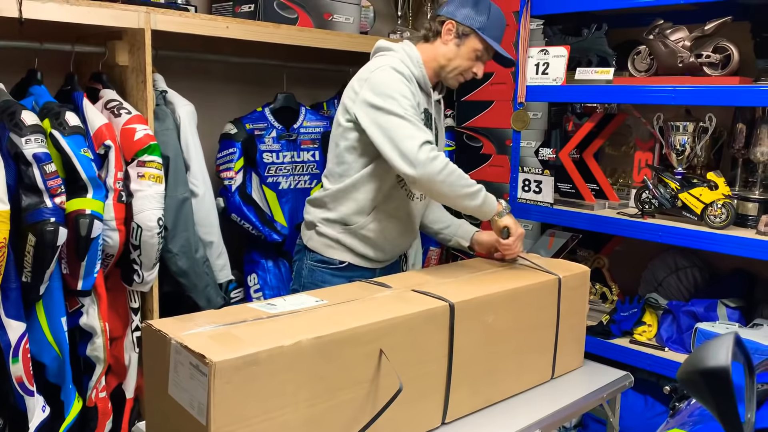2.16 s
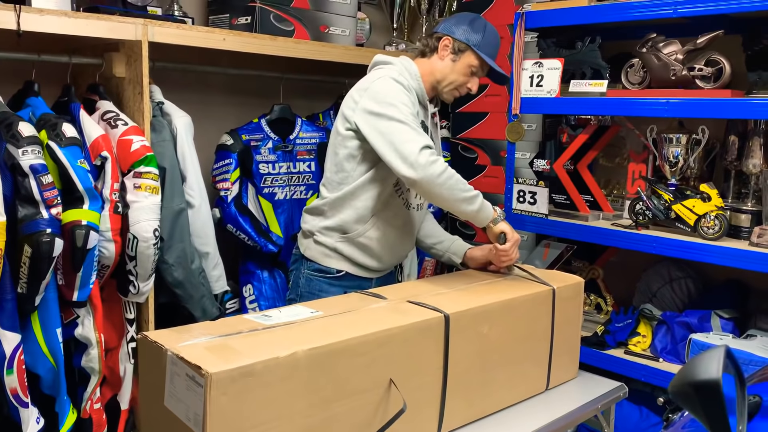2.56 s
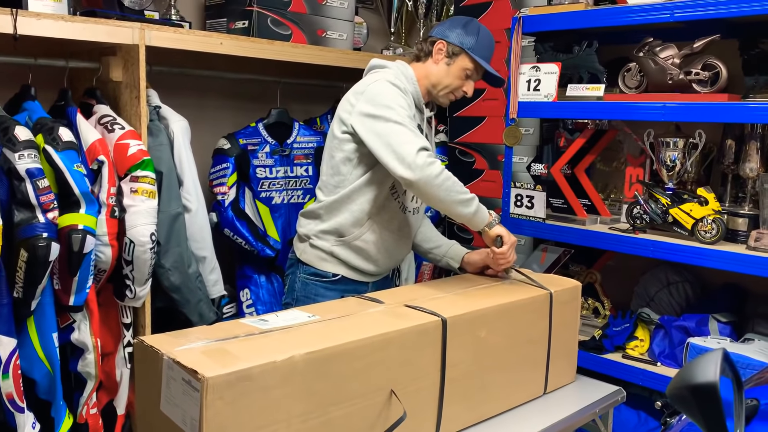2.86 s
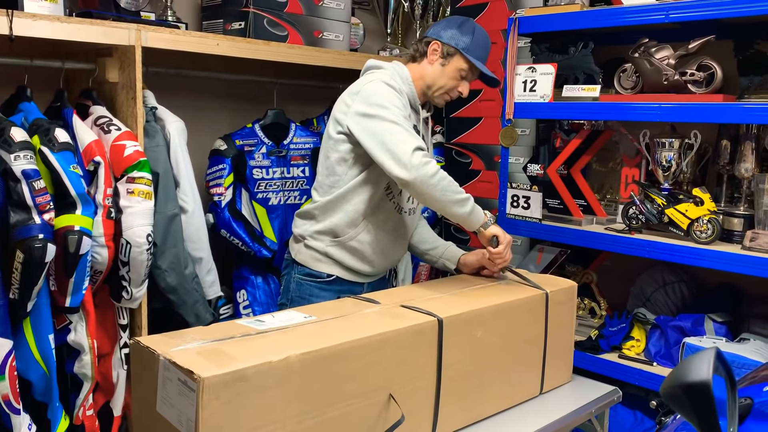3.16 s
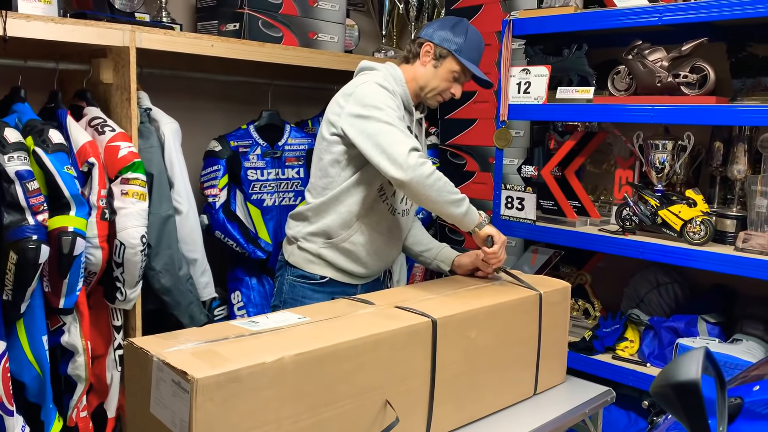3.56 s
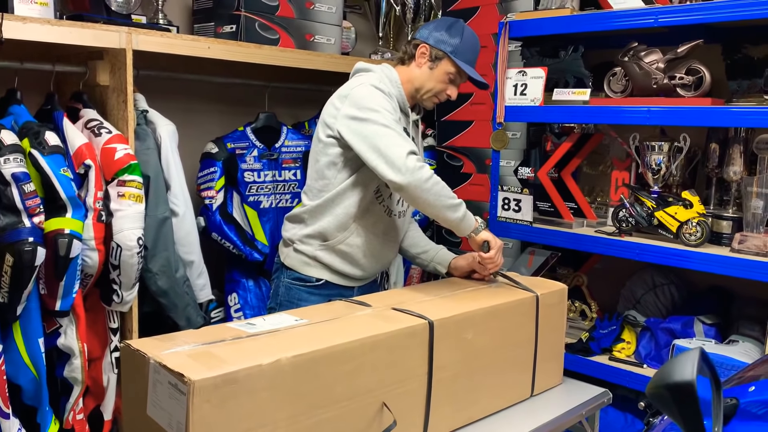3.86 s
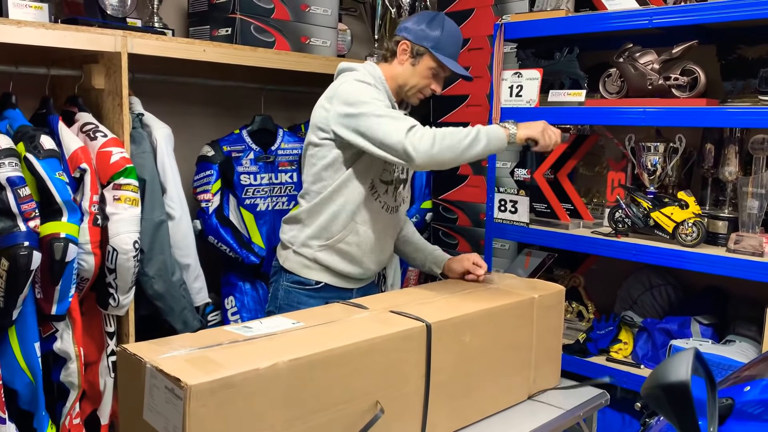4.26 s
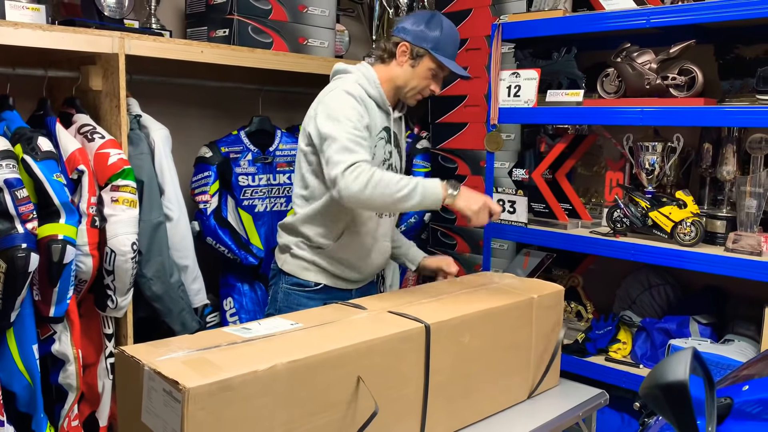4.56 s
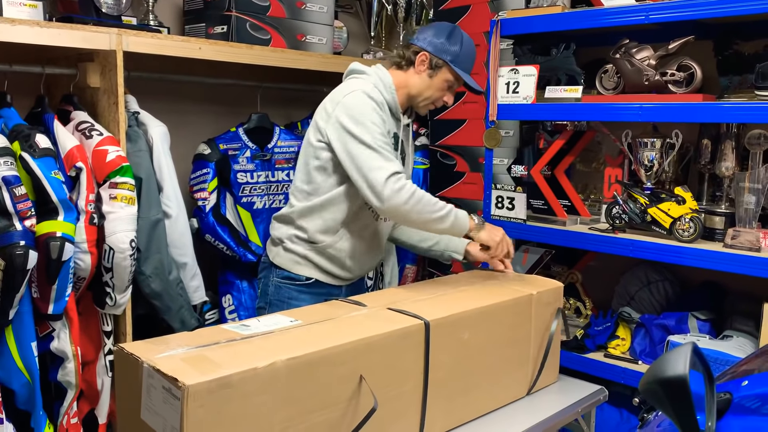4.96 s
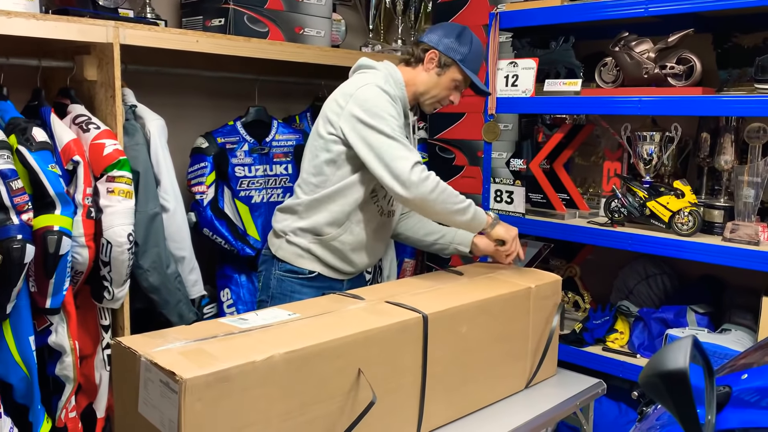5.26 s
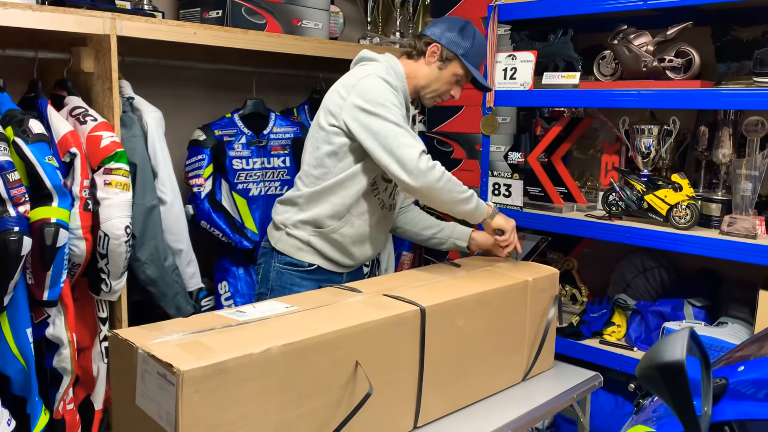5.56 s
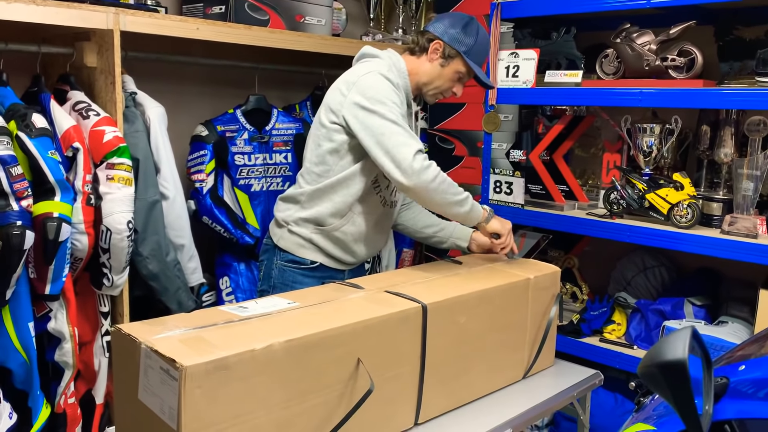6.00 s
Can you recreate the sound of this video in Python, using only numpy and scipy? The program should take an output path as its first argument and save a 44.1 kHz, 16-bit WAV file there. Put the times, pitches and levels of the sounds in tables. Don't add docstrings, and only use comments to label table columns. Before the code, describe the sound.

Someone cuts tight plastic straps from a long carton. A ripping crackle bursts into the loudest snap, with a boomy box hum and short dense room tail. Faint rubbing, dull palm knocks and dry ticks fill the gaps. Two more strong snaps come later, then loose strap slaps, a brief steel chatter and a weaker final crack. Close stereo phone pickup, quiet garage, no speech.

```python
import sys
import numpy as np
from scipy import signal
from scipy.fft import rfft, irfft
from scipy.io import wavfile
from scipy.ndimage import uniform_filter1d

SR = 44100
rng = np.random.default_rng(int(sys.argv[2]) if len(sys.argv) > 2 else 0)


def undo_db(level):
    steps = np.asarray(level, float) / 20
    return 10 ** steps


def put_to_file(sound):
    columns = np.atleast_2d(sound).T
    safe = np.clip(columns, -1, 1)
    whole_steps = np.round(safe * 32767)
    wavfile.write(sys.argv[1], SR, whole_steps.astype(np.int16))


N = 270333

# [t/s, crack level/dB, then over the crack: box drum/dB, flaps/dB, sizzle/dB]
SNAPS = [
    (.336, -30.5, -11.5, -7.5, -1),
    (0.37, -27, -41, -11, 5),
    (.4305, -17.5, -24, -35, -6),
    (0.4411, -17.5, 3, 3, 0.5),
    (2.909, -22, -6.5, -6, -5),
    (4.0425, -25.5, 3, 10.5, 2),
    (4.392, -45.5, -14, -23, -2),
    (4.4447, -46.5, 3.5, 10.5, 12),
    (4.484, -40.5, -25, 4.5, -25),
    (5.7903, -23, -11, -9, -12),
]
TEARING = (0, 2, 6)
CREEPING = (0, 6)
# [t/s, crack level/dB, cardboard over crack/dB, sizzle over crack/dB]
TICKS = [(0.1211, -50, -3.5, -27), (0.2075, -43, -30, 1.5), (0.7663, -50.5, -7, 8),
         (1.303, -55.5, -14.5, 11.5), (1.5678, -53.5, -12, 7), (2.0728, -59.5, 1, -24),
         (2.1153, -44, -19, 3), (2.210, -49, -21, -11), (2.351, -41.5, -11.5, -1.5),
         (2.475, -46.5, -33, -2), (2.5177, -50, -6.5, -18), (2.599, -44, -6.5, -6),
         (2.670, -48.5, -10, -2.5), (2.836, -38, -13, -4.5), (3.051, -42.5, -39, -1.5),
         (3.411, -49.5, -44, 2), (3.8723, -53.5, -7.5, -24), (3.974, -49.5, -24.5, -2.5),
         (4.332, -52, -31, 17), (4.7866, -61, -2, -14), (4.816, -45.5, -20, 6.5), (4.912, -48, 2, 3.5),
         (4.994, -52.5, -9, 1), (5.0559, -50.5, -33, -38), (5.2585, -44.5, -10.5, 4),
         (5.4114, -59, -25, 7.5), (5.512, -44, -9.5, -2), (5.5232, -43, -14, 7), (5.6202, -70, -21, 24),
         (5.689, -47.5, -10.5, -1.5)]
SCUFFING = (0, 21, 22, 26, 29)
# [t/s, box drum level/dB, flaps over drum/dB, crack over drum/dB]
KNOCKS = [(0.019, -55.5, -24, 3.5), (0.2721, -45, -12, -7), (0.303, -50, 0.5, -14),
          (0.697, -45.5, -2.5, -14), (1.3561, -47.5, -22.5, -5), (1.4112, -79, 20, -14),
          (1.445, -59.5, -3.5, 0.5), (1.5106, -41, -5.5, -8), (1.6388, -46.5, -6.5, -12.5),
          (2.2512, -75, -14, -19), (2.7786, -77.5, 11, 9), (3.2981, -47.5, -9, -16.5),
          (3.436, -56.5, -29.5, -26), (3.769, -47.5, -12, -17.5), (3.8463, -48, -10.5, -14),
          (4.2472, -50, 0.5, -7.5), (4.6641, -49.5, -3.5, -22.5), (5.3654, -68, -11.5, 3),
          (6.047, -59.5, 4.5, 4.5)]
# [t/s, crack level/dB, cardboard over crack/dB, sizzle over crack/dB, length/s]
SWISHES = [(0.327, -40, 3, -22, 0.03), (0.874, -40.5, -7, -24.5, 0.061), (0.901, -37, -14, -20, 0.0093),
           (0.9452, -38.5, -10, -38.5, 0.019), (1.164, -47, -20, -47, 0.0086),
           (1.1933, -42, -7.5, -40.5, 0.011), (2.5036, -42, -5.5, 1, 0.011),
           (4.4118, -44.5, 7.5, 11, 0.0044), (5.563, -43, -23.5, 7, 0.01), (6.063, -67.5, 7.5, 2, 0.022),
           (6.102, -81, 0, 3, 0.02)]
# [f/Hz, level/dB, t60/s]
BOX = [(59, -12, 0.22), (122, -9, 0.051), (165, -3.5, 0.11), (230, -3, 0.11), (260.3, -1, 0.1),
       (326.5, 6.5, 0.039), (426.6, -3.5, 0.16), (450.2, -7.5, 0.057), (460, -3.5, 0.17),
       (507.6, -4, 0.084), (624, -9, 0.047), (650, -17, 0.018)]
# [f/Hz, level/dB, t60/s]
FLAPS = [(640, -1, .018), (830, -3, .015), (960, -4, .015), (1080, -1, .018), (1290, -3, .015),
         (1490, 0, .016), (1690, -4, .012), (1900, -6, .012), (2270, -7, .009), (2650, -10, .009),
         (2960, -10, .009), (3470, -11, .009), (4200, -15, .006), (4690, -17, .006)]
# [t/s, f/Hz, level/dB, t60/s]
SLAPS = [(.432, 1090, -33.5, 0.0088), (.441, 1660, -23.5, 0.016), (.452, 1030, -29, 0.012),
         (.462, 839, -32, 0.076), (.492, 1270, -34.5, 0.017), (.505, 726, -35.5, 0.075),
         (.560, 695, -60.5, 0.04), (.620, 806, -57, 0.046), (2.907, 2190, -27.5, 0.02),
         (2.908, 3030, -28.5, 0.022), (2.909, 1620, -25.5, 0.016), (2.912, 486, -19.5, 0.017),
         (2.917, 3450, -37.5, 0.05), (2.922, 429.4, -22.5, 0.075), (2.931, 555, -35.5, 0.063),
         (2.942, 3440, -31.5, 0.032), (4.042, 2550, -32.5, 0.015), (4.042, 1600, -33.5, 0.023),
         (4.047, 1084, -28, 0.031), (4.070, 3450, -43.5, 0.051), (4.455, 960, -37, .025),
         (5.790, 916, -32, 0.049), (5.795, 498, -28, 0.034), (5.801, 1270, -39.5, .03),
         (5.811, 587, -36, 0.044)]
# [t/s, f/Hz, level/dB, t60/s]
PLUCKS = [(0.137, 3270, -57.5, 0.03), (0.697, 1240, -52, 0.0058), (0.886, 1170, -51, 0.049),
          (.914, 1050, -46.5, 0.037), (1.205, 750, -63.5, 0.12), (1.805, 1400, -57, 0.011),
          (1.850, 518, -49, 0.055), (2.069, 1875, -48, 0.038), (2.071, 1014, -62, 0.013),
          (2.254, 1060, -58, 0.025), (2.353, 2750, -55.5, 0.019), (2.520, 2820, -48.5, 0.0096),
          (3.224, 1135, -71.5, 0.043), (3.235, 701, -66, 0.045), (3.260, 960, -73, .04),
          (3.301, 710, -62, 0.036), (3.41, 2350, -70, 0.02), (3.873, 1070, -55, 0.044),
          (3.875, 1627, -63.5, 0.034), (5.6, 930, -73, .029), (4.768, 874, -66, 0.024),
          (4.783, 5560, -61, 0.096), (4.787, 1052, -63.5, 0.017), (4.831, 1600, -53, 0.03),
          (4.864, 800, -57, 0.02), (4.992, 1940, -64, 0.018), (4.994, 3000, -67, 0.023),
          (5.056, 2740, -50.5, 0.0061), (5.154, 2880, -65, 0.007), (5.361, 948, -61.5, 0.016),
          (5.514, 1410, -57, 0.04), (5.978, 1610, -56.5, .008)]
# [t/s, f/Hz, level/dB, t60/s]
TAPS = [(.3355, 1100, -32.5, 0.016), (.343, 299, -38.5, 0.032), (.3705, 1902, -32.5, 0.0084),
        (0.469, 770, -27, 0.061), (.4415, 1603, -14.5, .008), (.4435, 384, -19.5, .03),
        (.4935, 1483, -31, .006), (2.169, 291, -61, 0.042), (2.254, 373, -54, .04),
        (2.352, 474, -57, 0.038), (2.475, 4750, -55, .015), (2.506, 471, -52, .03), (2.520, 4200, -57, .03),
        (2.613, 290, -49.5, 0.056), (2.662, 300, -49.5, .04), (2.775, 919.5, -64, .015),
        (2.836, 1048, -50, .02), (2.9098, 1497, -18.5, 0.013), (2.9100, 2906, -19.5, 0.0089),
        (2.9118, 450, -21.5, 0.016), (2.9140, 2282, -21.5, 0.01), (4.0425, 2870, -20, 0.0056),
        (4.0438, 1089, -16, .008), (4.0455, 403, -16.5, 0.021), (4.404, 788, -44.5, 0.015),
        (4.413, 400, -42, 0.022), (4.4445, 950, -30, 0.0091), (4.449, 2224, -36, 0.01),
        (4.476, 650, -39.5, .015), (4.4843, 1560, -38, 0.013), (4.505, 1300, -44.5, 0.0091),
        (0.118, 910, -56, 0.021), (0.137, 1890, -53.5, .015), (.212, 2160, -56, 0.01),
        (4.053, 298, -21, 0.091), (0.455, 583, -31, 0.084), (0.891, 1106, -46.5, 0.042),
        (0.909, 1170, -51, 0.026), (1.503, 302, -44.5, 0.069), (3.412, 8300, -52, 0.035),
        (3.4122, 4700, -59, 0.023), (4.664, 1003, -54, .025), (4.685, 990, -57, 0.039),
        (4.831, 1650, -66, .015), (4.913, 4320, -51, 0.015), (5.256, 1990, -55, 0.0094),
        (5.363, 1484, -64.5, .008), (5.791, 1040, -30.5, 0.011), (5.796, 347, -42, 0.022)]
# [t/s, f/Hz, level/dB, t60/s]
CRACKLES = [
    (.3698, 7500, -26, .003),
    (.3865, 5500, -32, .003),
    (3.4105, 7000, -43, .003),
    (4.399, 8200, -42, .006),
]
# [t/s, level/dB]
TINKLES = [
    (0.2137, -62.5),
    (1.567, -56.5),
    (2.1196, -60.5),
    (5.56, -62.5),
    (5.688, -62),
]
# [f/Hz, level/dB, t60/s]
BLADE = [(4850, 0, .035), (4740, -4, .03), (4900, -5, .03), (8600, -11, .03)]
# [t/s, level/dB]
CLINKS = [
    (4.814, -45),
    (4.82, -43),
    (4.831, -42),
    (4.841, -43.5),
]
# [f/Hz, level/dB, t60/s]
BUCKLE = [(1194, -8, 0.11), (1610, -5, .03), (1680, -0.5, 0.029), (2050, -2, 0.047), (3380, -6, 0.081),
          (4515, -2, 0.036), (4830, -3, 0.089), (5560, -11, 0.058), (6180, 7, 0.032), (6660, 2, 0.037),
          (7500, -15.5, 0.033)]
# [t/s, hold/s, rub level/dB, box murmur level/dB]
STROKES = [(0.0, 0.0042, -54, -42), (0.355, 0.021, -45.5, -47), (0.478, 0.014, -49, -38.5),
           (0.578, 0.13, -55.5, -43), (0.954, 0.068, -65.5, -59), (1.155, 0.07, -61.5, -68.5),
           (1.35, 0.026, -67, -59), (1.519, 0.04, -53.5, -46), (1.744, 0.2, -56.5, -52.5),
           (2.175, 0.12, -73.5, -63), (2.547, 0.14, -63, -54.5), (2.987, 0.013, -50.5, -43),
           (3.239, 0.057, -74.5, -66), (3.366, 0.08, -101, -66), (3.54, 0.017, -86.5, -75),
           (3.892, 0.06, -92, -75), (4.087, 0.032, -47, -47), (4.188, 0.061, -60.5, -39.5),
           (4.414, 0.037, -47.5, -39.5), (4.582, 0.055, -67.5, -53), (4.95, 0.18, -70, -61),
           (5.281, 0.24, -70.5, -64.5), (5.559, 0.12, -70, -64.5), (5.799, 0.045, -48.5, -43),
           (6.065, 0.033, -54, -44)]
# [f/Hz, level/dB per Hz]
RUB_COLOUR = [(350, -33), (600, -6.5), (923, 8), (1030, 1), (1600, 1), (2290, -2.5), (3660, -13),
              (4330, -2.5), (5840, -7), (10500, -16.5), (13600, -47), (22000, -120)]
# [f/Hz, level/dB against the last point kept]
RUB_TOP = [(10500, -11), (13000, -3), (16000, -11)]
# [t/s, level/dB]
SCRAPE = [
    (1.64, -85),
    (1.674, -61.5),
    (1.746, -58),
    (1.804, -53),
    (1.836, -49.5),
    (1.932, -55.5),
    (2.028, -78),
    (2.058, -85.5),
    (2.07, -59),
]
# [f/Hz, level/dB per Hz]
SCRAPE_COLOUR = [(710, -41), (1200, -16), (1950, -13), (2100, -5.5), (2300, -6.5), (3300, -11.5), (4190, 0),
                 (5180, -3), (8350, -10.5), (10800, -11.5), (14000, -47), (22000, -120)]
# [f/Hz, level/dB]
MURMUR = [(150, 0), (300, 0), (450, -7), (800, -4)]
# [t/s, lower tone level/dB, upper tone level/dB]
HUMS = [
    (0.02, -53.5, -71),
    (0.332, -44.5, -60),
    (0.444, -22, -24),
    (0.864, -53.5, -57.5),
    (1.512, -46.5, -50),
    (2.913, -32, -47.5),
    (3.301, -67.5, -62),
    (4.046, -42.5, -32),
    (4.919, -73, -57),
    (5.795, -57.5, -44),
]
# [f/Hz, t60/s]
CAVITY = [(156, 0.47), (231, 0.39)]
# [f/Hz, t60/s]
GARAGE_T60 = [(60, 0.3), (160, 0.042), (420, 0.27), (1100, 0.24), (2910, 0.3), (7680, 0.24)]
# [f/Hz, level/dB]
GARAGE_WET = [(60, -13.5), (250, -11), (1000, -10.5), (2000, -3.5), (3100, -3), (4200, 1), (6500, 2),
              (12000, -4)]
# [f/Hz, likeness 0-1]
LIKENESS = [(60, 0.8), (250, 0.12), (500, 0.5), (1000, 0.4), (4000, 0), (8000, 0.1), (12000, 0.5)]
# [f/Hz, level/dB per Hz]
AIR = [(18, -51.5), (30, -25), (53, -1.5), (75, -8), (112, -18.5), (684, -41), (1600, -41.5), (7270, -43.5),
       (10800, -55.5), (16000, -48.5)]
# [t/s, level/dB]
JOLTS = [(0.0, -49.5), (0.48, -32.5), (0.719, -50), (0.89, -58), (1.07, -57), (1.4, -65), (1.62, -54.5),
         (1.77, -62), (1.96, -68.5), (2.471, -47), (2.599, -56), (2.95, -45), (3.149, -62.5),
         (3.361, -57.5), (3.809, -63), (4.08, -33.5), (4.249, -55), (4.81, -66), (4.931, -45.5),
         (5.099, -57.5), (5.339, -57), (5.511, -64), (5.7, -56.5), (5.85, -41.5)]
# [f/Hz, level/dB]
LEFT_PORT = [(25, -2), (80, -2), (250, -1), (600, 0), (1500, 1), (4000, -0.5), (12000, 0)]
# [f/Hz, lag/samples]
PORT_LAG = [(80, 10), (200, 13), (500, 7), (1200, 2), (4000, 2), (6000, 0)]
# [f/Hz, level/dB]
MIC = [(20, -9), (100, -1), (1000, 7.5), (4000, 2), (6000, -4), (9000, 3), (10800, -1.5), (13000, 0.5),
       (16000, 1.5)]
# [f/Hz, frame-to-frame wander/Hz]
GAP_EDGES = [(10950, 180), (12250, 200), (15150, 380)]

SNAP_HUMPS_DB, TICK_HUMPS_DB = 1.5, 3.5
STROKE_RISE_DB_S, STROKE_FALL_DB_S = 213.5, 167


def snaps():
    rows = [(*row, .008 if k in TEARING else .0045) for k, row in enumerate(SNAPS)]
    return blows(rows, gain_db=4.3, drum_db=7.2, flap_db=1.8, sizzle_db=0.93, lead_db=-14.0, lead_s=0.0066,
                 spike=8.5, humps_db=SNAP_HUMPS_DB, drum_top_hz=2000, soft=CREEPING)


def ticks():
    rows = [(s, db, card, card, top, .008 if k in SCUFFING else .0013)
            for k, (s, db, card, top) in enumerate(TICKS)]
    return blows(rows, gain_db=-.6, drum_db=-0.43, flap_db=-2.0, sizzle_db=-0.47, lead_db=-14.0, lead_s=0.0033,
                 spike=0.92, humps_db=TICK_HUMPS_DB, drum_top_hz=980, soft=SCUFFING)


def knocks():
    sizzle_over_crack_db, contact_s = -5.5, .009
    rows = [(s, db + crack, -crack, flap - crack, sizzle_over_crack_db, contact_s)
            for s, db, flap, crack in KNOCKS]
    return blows(rows, gain_db=-0.81, drum_db=-0.26, flap_db=-1.15, sizzle_db=0, lead_db=-18.0, lead_s=0.0068,
                 spike=15.0, humps_db=TICK_HUMPS_DB, drum_top_hz=260)


def swishes():
    rows = [(s, db, card, card, top, length) for s, db, card, top, length in SWISHES]
    return blows(rows, gain_db=-4.0, drum_db=-6.5, flap_db=-9.0, sizzle_db=-7.0, lead_db=-0.93, lead_s=0.048,
                 spike=0, humps_db=TICK_HUMPS_DB, drum_top_hz=900)


def blows(events, gain_db, drum_db, flap_db, sizzle_db, lead_db, lead_s, spike, humps_db, drum_top_hz, soft=()):
    out, t = np.zeros(N), np.arange(-768, 3328) / SR
    for k, (s, db, box, flap, top, length) in enumerate(events):
        grit = rng.standard_normal(len(t))
        grit = grit * undo_db(5.3 * rng.standard_normal(len(t) // 32).repeat(32))
        creep_db, creep_s = (-5, .007) if k in soft else (lead_db, lead_s)
        lead = undo_db(creep_db) * np.exp(np.minimum(t, 0) / creep_s)
        chatter = np.exp(-t / np.clip(length, .0005, .04))
        contact = grit * np.where(t < 0, lead, chatter)
        contact, strap = even(contact + spike * (t == 0) * (k not in soft), humps_db)
        s = max(s + t[0], 0)
        crack = band(band(strap, 1900, 18000), 1800, 7500)
        sizzle = band(band(strap, 7300, 17500), 6500, 19000)
        add(out, crack, s, db + gain_db)
        add(out, -sizzle, s, db + top + sizzle_db)
        flaps = ring(FLAPS, 2.5, .015, size=2000)
        add(out, signal.fftconvolve(contact, flaps), s, db + flap + flap_db)
        drum = signal.fftconvolve(contact, ring(BOX, 1.5, .012, size=12000))
        add(out, band(drum, 25, drum_top_hz), s, db + box + drum_db)
    return out


def even(x, humps_db):
    spectrum = rfft(x)
    flat = spectrum / np.sqrt(uniform_filter1d(np.abs(spectrum) ** 2, size=60))
    humps = rng.standard_normal(len(flat) // 64 + 1).repeat(64)
    humps = uniform_filter1d(humps, size=64)[:len(flat)]
    return irfft(flat, len(x)), irfft(flat * undo_db(humps_db * humps), len(x))


def ring(modes, scatter_db, detune, size=26000):
    hz, db, t60 = np.array(modes, float).T[:, :, None]
    chance = rng.standard_normal((2, len(modes), 1))
    t = np.arange(size) / SR
    sign = (-1.) ** np.arange(len(modes))[:, None]
    strength = sign * undo_db(db + scatter_db * chance[0])
    fade = np.exp(-np.log(1000) * t / t60)
    return (strength * fade * np.sin(2 * np.pi * hz * (1 + detune * chance[1]) * t)).sum(0)


def plucks():
    out, t = np.zeros(N), np.arange(200) / SR
    for s, hz, db, t60 in PLUCKS + SLAPS:
        touch = rng.standard_normal(200) * np.exp(-t / .0012)
        panel = ring([(hz, 0, t60)], 0, 0, size=6000)
        add(out, signal.fftconvolve(touch, panel), s, db)
    return out


def taps():
    out, t = np.zeros(N), np.arange(3000) / SR
    for s, hz, db, t60 in TAPS + CRACKLES:
        thud = np.exp(-np.log(1000) * t / t60) * np.sin(2 * np.pi * hz * t)
        add(out, band(thud, hz / 2, hz * 4), s, db)
    return out


def blade():
    out = np.zeros(N)
    for s, db in TINKLES:
        add(out, ring(BLADE, .7, .003, size=8000), s, db + 12.0)
    for s, db in CLINKS:
        add(out, ring(BUCKLE, 2.5, .006, size=8000), s, db)
    return out


def hands():
    grains = rng.standard_normal((2, N))
    grains = grains * undo_db(2.2 * np.minimum(rng.exponential(1, (2, N)), 5))
    rub = unit(colour(grains[0], with_top(RUB_COLOUR))) * flicker(30, 2.5)
    scrape = unit(colour(grains[1], with_top(SCRAPE_COLOUR))) * flicker(40, 1.2)
    palms = rng.standard_normal(N) * flicker(30, 3.0)
    murmur = unit(signal.fftconvolve(palms, ring(BOX[1:], 0.77, 0.0016))[:N])
    murmur = unit(colour(murmur, MURMUR))
    s, hold, rub_db, murmur_db = np.array(STROKES).T
    rub = rub * swells(s, hold, rub_db - 13.5, STROKE_RISE_DB_S, STROKE_FALL_DB_S)
    murmur = murmur * swells(s, hold, murmur_db - 10.5, STROKE_RISE_DB_S, STROKE_FALL_DB_S)
    return rub + murmur + scrape * curve(SCRAPE, axis=1) * undo_db(-7.5)


def with_top(points):
    return points[:-2] + [(hz, db + points[-3][1]) for hz, db in RUB_TOP]


def hum(swell_s=0.0095):
    out, t = np.zeros(N), np.arange(30000) / SR
    for s, *levels in HUMS:
        for (hz, t60), db in zip(CAVITY, levels):
            tone = ring([(hz, 0, t60)], 0, 0.0051, size=len(t))
            add(out, tone * (1 - np.exp(-t / swell_s)), s, db - 5.0)
    return out


def garage(x, rise_s=0.0035):
    t, tail = np.arange(SR // 2) / SR, 0
    for hz in 50 * 2 ** np.arange(0, 8.5, 1 / 3):
        echoes = spread(hz, len(t)) * np.exp(-np.log(1000) * t / on_hz(GARAGE_T60, hz))
        tail = tail + undo_db(on_hz(GARAGE_WET, hz)) * unit(echoes) * np.sqrt(hz / SR / len(t))
    tail = tail * (1 - np.exp(-t / rise_s))
    grain = undo_db(3.0 * rng.standard_normal(len(t) // 150).repeat(150))
    pair = np.array([[1, 1.0], [1, -1.06]]) / np.sqrt(2)
    spectrum = rfft(pair @ (tail * grain))
    power = np.abs(spectrum) ** 2
    levelling = np.sqrt(uniform_filter1d(power, size=600) / uniform_filter1d(power, size=60))
    tail = pair @ irfft(spectrum * levelling, len(t))
    return signal.fftconvolve(x[None], tail, axes=1)[:, :N]


def spread(hz, size):
    like = np.clip(on_hz(LIKENESS, hz), 0, 1)
    mid, side = band(rng.standard_normal((2, size)), hz / 2 ** (1 / 6), hz * 2 ** (1 / 6))
    return np.sqrt(1 + like) * mid + np.sqrt(1 - like) * side * np.array([[1], [-1]])


def air():
    tone = rng.standard_normal(N) + 4.3 * rng.standard_normal((2, N))
    tone = unit(colour(tone, AIR)) * undo_db(-73)
    deep = unit(band(rng.standard_normal(N) + 0.073 * rng.standard_normal((2, N)), 22, 83))
    s, db = np.array(JOLTS).T
    hold_s = np.full(len(s), 0.0081)
    return tone + deep * swells(s, hold_s, db - 6.5, rise_db_s=298.5, fall_db_s=146)


def on_hz(table, hz):
    t = np.array(table, float)
    return np.interp(np.log(np.maximum(hz, 1)), np.log(t[:, 0]), t[:, 1])


def unit(x):
    return x / np.sqrt(np.mean(x ** 2))


def colour(x, table):
    size = x.shape[-1]
    hz = np.arange(size // 2 + 1) * SR / size
    return irfft(rfft(x) * undo_db(on_hz(table, hz)), size)


def band(x, lo_hz, hi_hz):
    sos = signal.butter(2, [lo_hz, min(hi_hz, .45 * SR)], "band", fs=SR, output="sos")
    return signal.sosfilt(sos, x)


def curve(rows, axis):
    t = np.array(rows)
    return undo_db(np.interp(np.arange(N) / SR, t[:, 0], t[:, axis], left=-120, right=-120))


def flicker(rate_hz, spread_db):
    k = int(SR / rate_hz)
    steps = np.repeat(rng.standard_normal(N // k + 1), k)
    return undo_db(spread_db * unit(uniform_filter1d(steps, k)[:N]))


def swells(starts, holds, levels_db, rise_db_s, fall_db_s):
    out, t = np.zeros(N), np.arange(N) / SR
    for s, hold, db in zip(starts, holds, levels_db):
        rise = rise_db_s * np.maximum(s - t, 0)
        fall = fall_db_s * np.maximum(t - s - hold, 0)
        out += undo_db(db - rise - fall)
    return out


def add(out, x, s, db):
    i = int(s * SR)
    out[i:i + len(x)] += (x * undo_db(db) / np.abs(x).max())[:N - i]


def scene():
    near = snaps() + ticks() + knocks() + swishes() + plucks() + hands()
    steel, tap = blade(), taps()
    direct = (near + steel + tap) * undo_db(-2.0)
    to_walls = near + steel * undo_db(-6.5) + tap * undo_db(-9)
    left, right = direct + garage(to_walls) * undo_db(1.5) + hum() + air()
    hz = np.arange(N // 2 + 1) * SR / N
    lag = np.exp(-2j * np.pi * hz * on_hz(PORT_LAG, hz) / SR)
    right = irfft(rfft(right) * lag, N)
    return np.array([colour(left, LEFT_PORT), right]) * undo_db(4.0)


def thin_treble(x):
    hz, _, frames = signal.stft(x, SR, nperseg=2048, noverlap=1536)
    count = frames.shape[-1]
    wander = rng.standard_normal((count // 4 + 1, 3)).repeat(4, axis=0)[:count].T
    low, high, top = (edge + width * np.clip(w, -2.5, 1.2) * sense
                      for (edge, width), w, sense in zip(GAP_EDGES, wander, (1, -1, 1)))
    holes = rng.random((len(hz) // 24 + 1, count // 4 + 1)) < .05
    holes = holes.repeat(24, axis=0).repeat(4, axis=1)[:len(hz), :count]
    hz = hz[:, None]
    empty = (hz > low) & (hz < high) | (hz > top) | holes & (hz > 9800)
    frames = frames * np.where(empty, undo_db(-45), 1)
    hollow = signal.istft(frames, SR, nperseg=2048, noverlap=1536)[1][:, :N]
    power = uniform_filter1d(band(x.mean(0), 6000, 16000) ** 2, size=128) + 1e-12
    before = np.roll(uniform_filter1d(power, size=1024), 700)
    jump = power > before * undo_db(2 * 14)
    attack = uniform_filter1d(1. * jump, size=256) > .1
    kept = colour(x - hollow, [(16300, 0), (16800, -25)])
    return hollow + kept * uniform_filter1d(1. * attack, size=64) * undo_db(-6)


def low_pass(x):
    return signal.sosfilt(signal.butter(12, 16790, fs=SR, output="sos"), x)


def record(dry):
    x = colour(dry, MIC)
    x = .99 * x / (1 + x ** 6) ** (1 / 6)
    return low_pass(thin_treble(x))


dry = scene()
out = record(dry)
put_to_file(out)
```